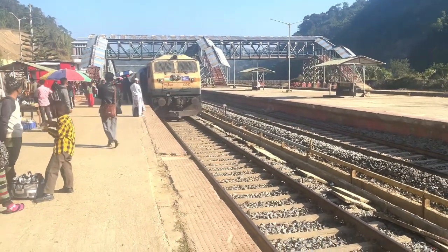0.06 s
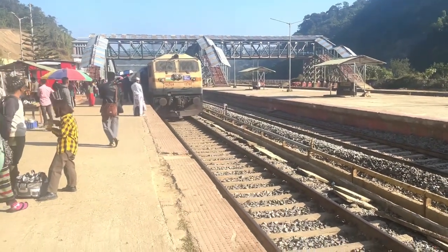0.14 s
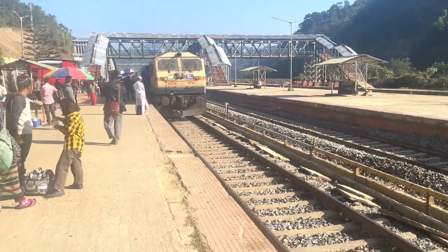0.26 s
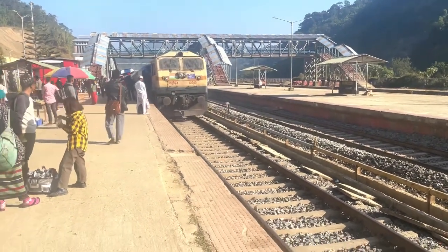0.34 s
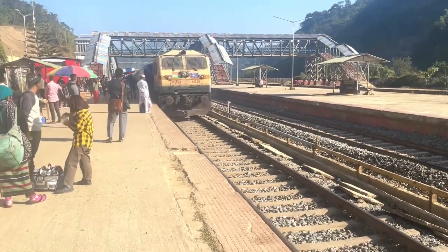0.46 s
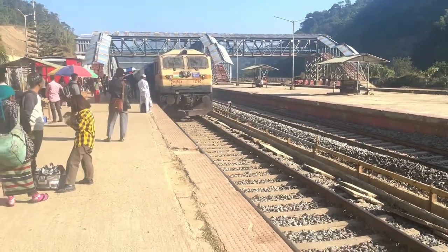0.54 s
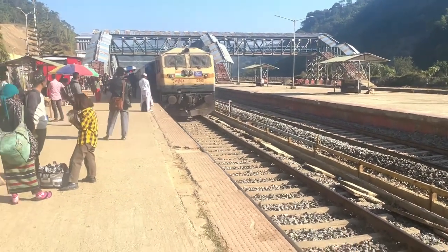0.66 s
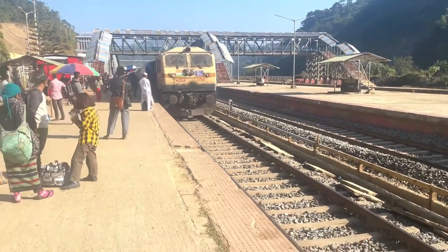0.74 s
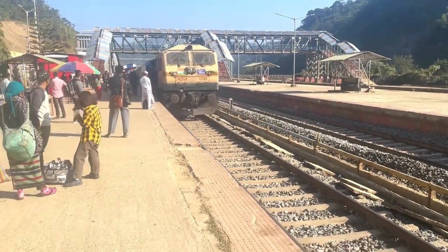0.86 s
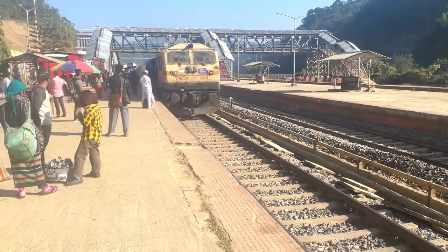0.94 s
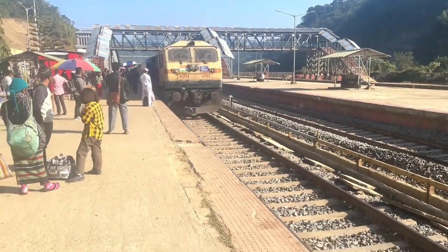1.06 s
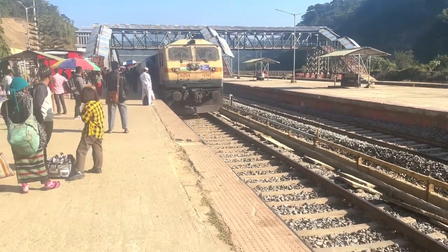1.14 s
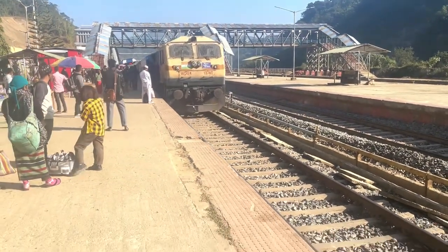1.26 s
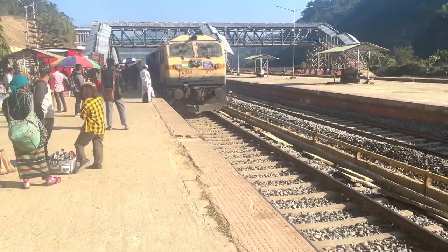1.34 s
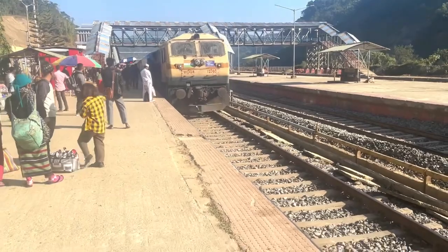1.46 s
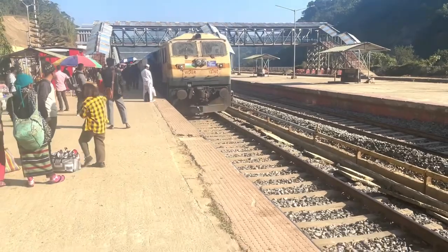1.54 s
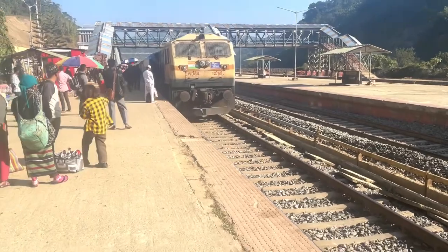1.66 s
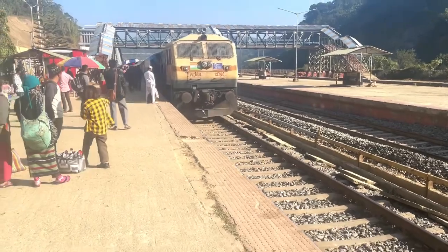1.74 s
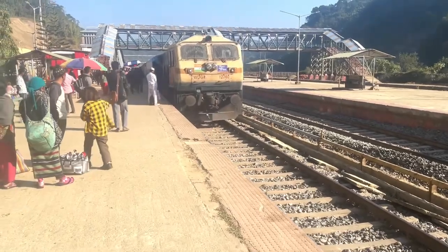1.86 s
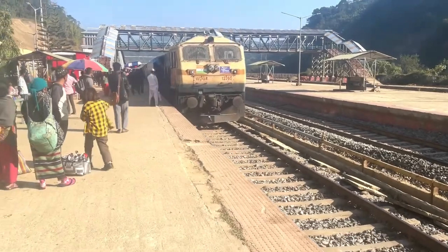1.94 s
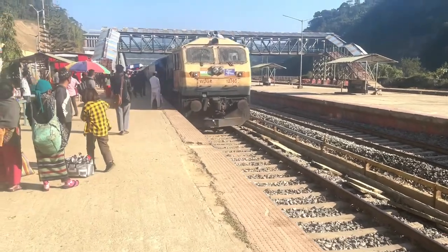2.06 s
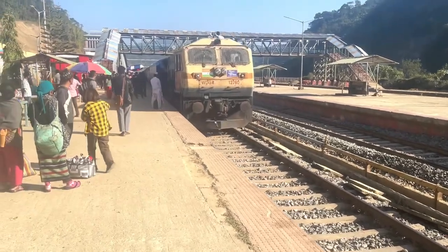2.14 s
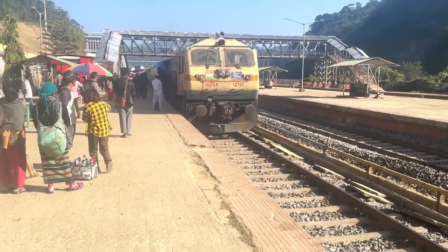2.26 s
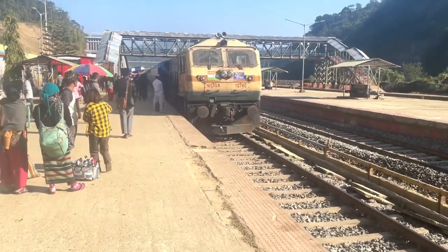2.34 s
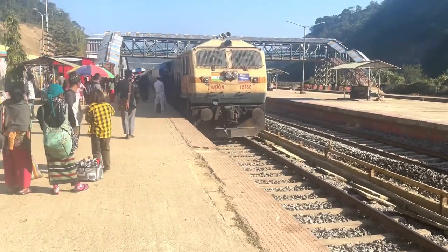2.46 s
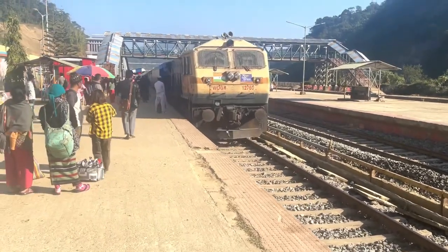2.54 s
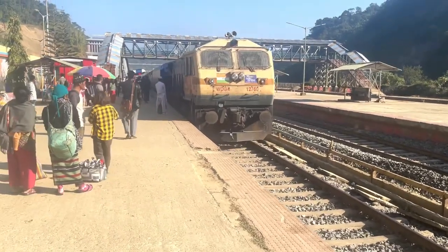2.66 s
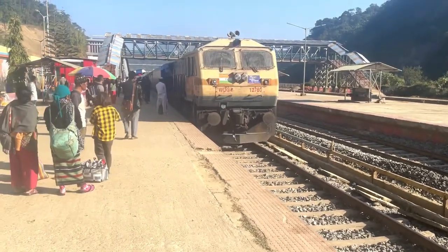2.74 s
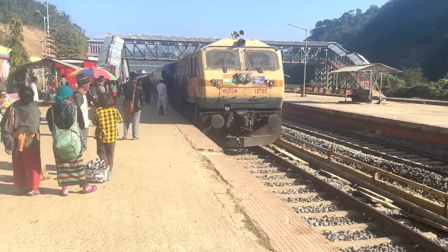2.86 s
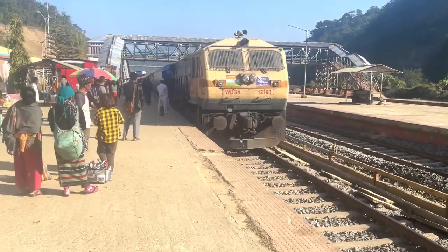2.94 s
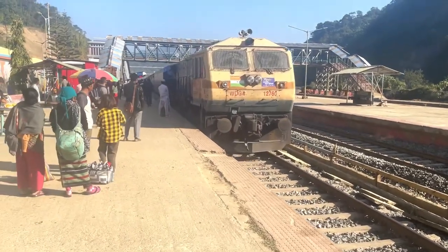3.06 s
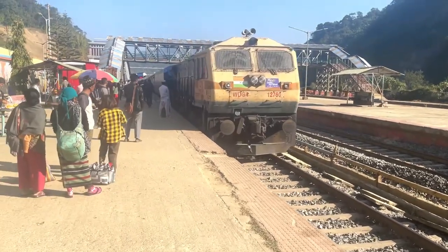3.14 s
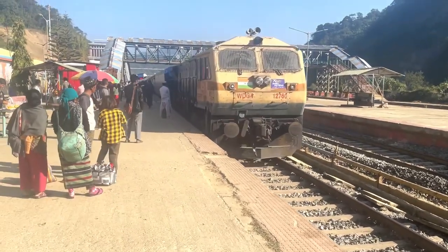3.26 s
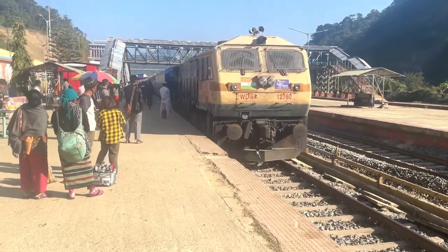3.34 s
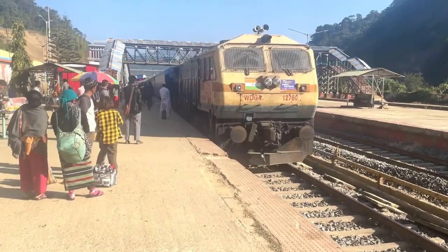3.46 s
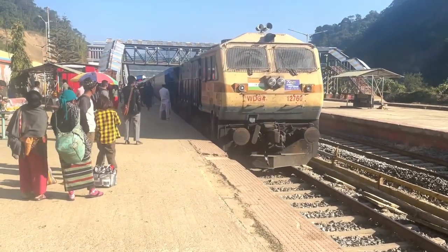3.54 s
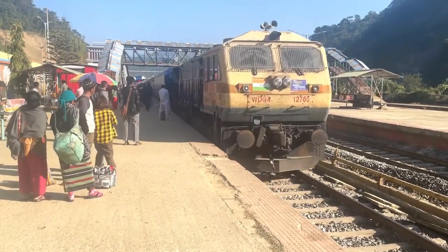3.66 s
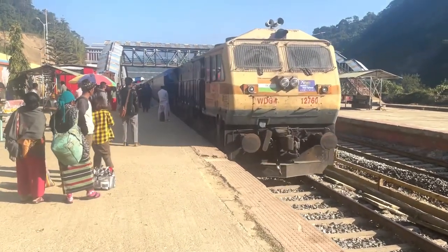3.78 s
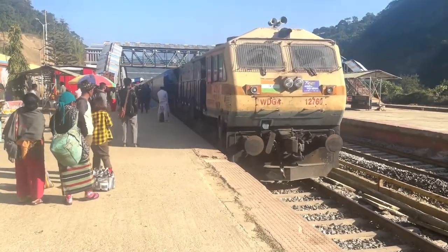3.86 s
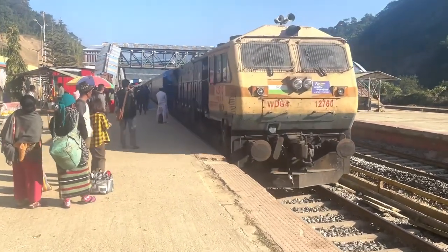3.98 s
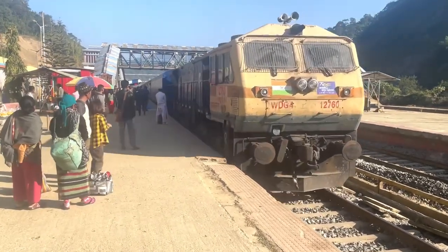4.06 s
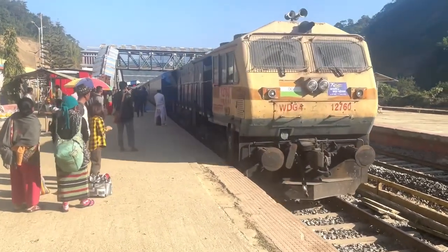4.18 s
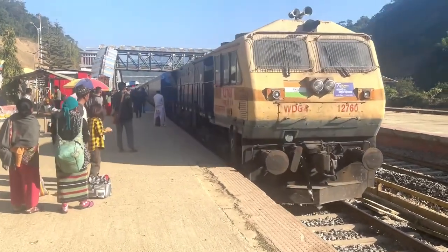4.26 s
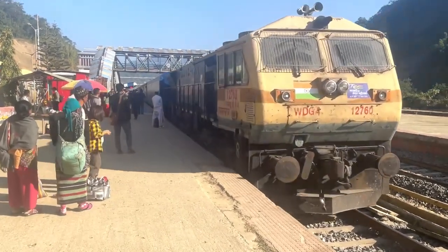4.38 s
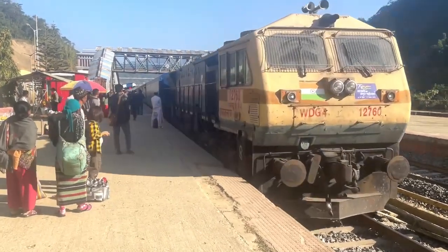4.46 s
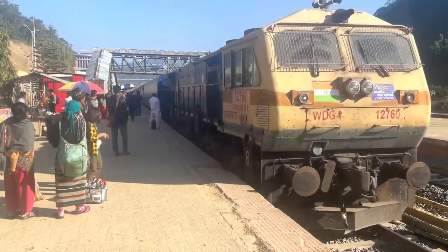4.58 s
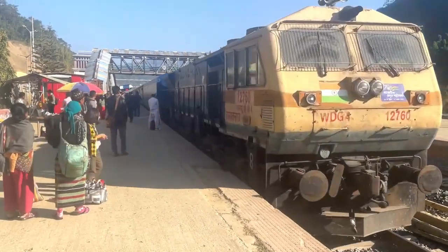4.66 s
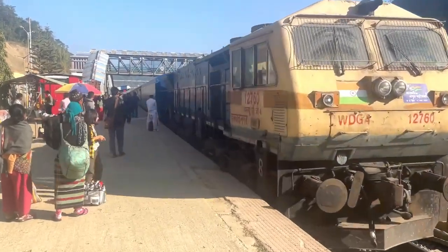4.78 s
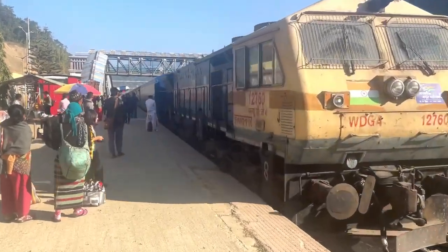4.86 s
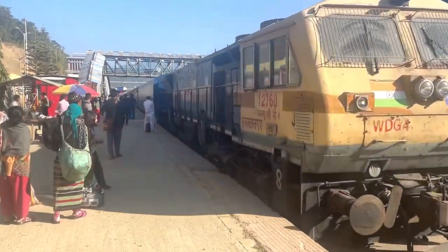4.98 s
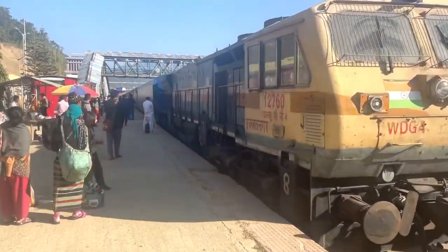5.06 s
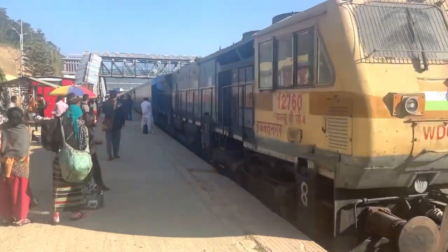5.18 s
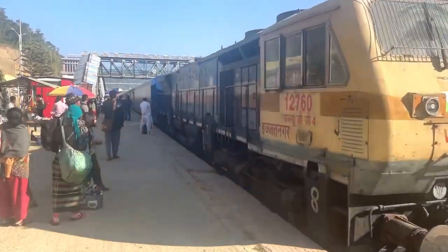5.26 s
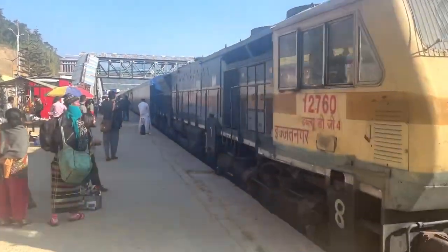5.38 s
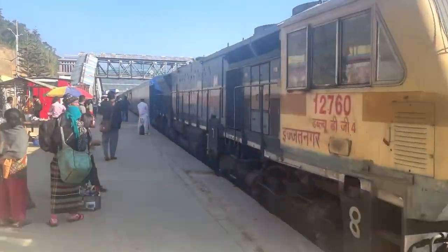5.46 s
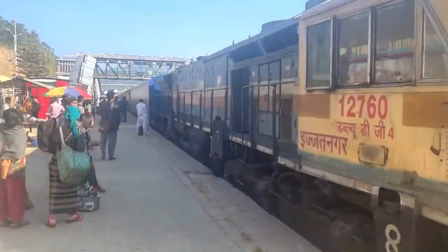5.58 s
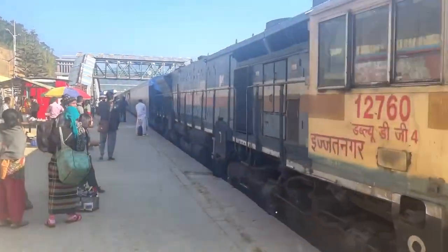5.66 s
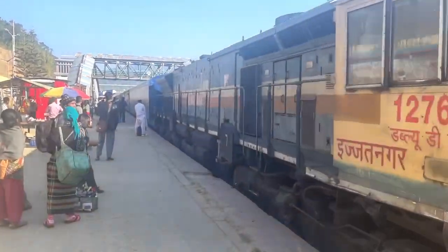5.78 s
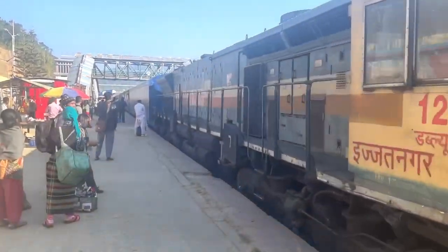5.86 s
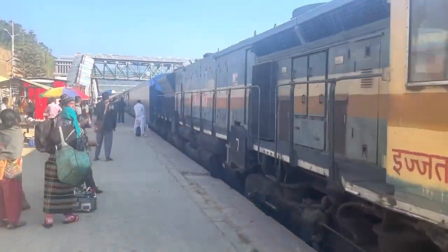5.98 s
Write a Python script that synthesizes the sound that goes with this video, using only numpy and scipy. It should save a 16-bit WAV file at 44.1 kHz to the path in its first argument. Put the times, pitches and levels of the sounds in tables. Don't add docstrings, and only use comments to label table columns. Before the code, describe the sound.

From 0 s a heavy diesel drone is already present: a deep buzzing hum around 50 and 90-105 Hz, throbbing unevenly about six times a second, with a second engine behind beating slowly against it. Above lies a soft, wide rush of wheels, fans and exhaust. Thin whines near 3 and 3.4 kHz, with fainter ones above 5 kHz, flicker in brief flares; treble dulls slightly around 1-2 s as people pass. From 3 s the locomotive nears and the whine grows sharper, squeal-like. Dull thuds fall at about 3.6, 3.9, 4.1 and 4.4 s, with a tiny air spit near 4. Through 4-5 s the roar and whines swell; another thud comes at 5.1. By 5.5-6 s the engine is abreast, full, rough and bright, still running when the sound cuts. Outdoor platform, handheld phone stereo, slight far-platform reflection, peaks softly rounded.

```python
import sys
import numpy as np
from scipy import signal
from scipy.fft import rfft, irfft, next_fast_len
from scipy.io import wavfile
from scipy.ndimage import uniform_filter1d

SR = 44100
rng = np.random.default_rng(int(sys.argv[2]) if len(sys.argv) > 2 else 0)


def master_out(mix):
    frames = np.transpose(np.atleast_2d(mix))
    ceiling = np.clip(frames, -1, 1)
    pcm = np.round(ceiling * 32767).astype(np.int16)
    wavfile.write(sys.argv[1], SR, pcm)


def invert_db(x):
    u = np.asarray(x, float) / 20
    return 10 ** u


N = 265041
T = np.arange(N) / SR


def front_engine(crank):
    # (order [per turn], far [dB], mid way [dB], near [dB])
    strong = [(8, -16, -13, -13), (9, -22, -30.5, -27), (15, -16, -14, -12.5), (16, -22.5, -26, -17.5),
              (17, -20.5, -17.5, -17)]
    # (order [per turn], far [dB], mid way [dB], near [dB])
    weak = [(7, -44, -43, -41), (10, -38, -42, -38), (11, -42, -40, -31), (12, -48, -33, -38),
            (13, -41, -28, -28), (18, -41, -35, -39), (19, -43, -42, -41), (21, -44, -42, -39),
            (23, -39, -41, -45), (24, -37, -35, -35), (30, -37, -38, -45), (31, -39, -41, -47),
            (32, -41, -42, -38), (33, -39, -42, -40)]
    # (order [per turn], time [s], half length [s], depth [dB], phase turn [rad])
    nulls = [(8, 5.12, 0.74, -16, -2.5), (9, 5, 0.83, -19, 1.5), (15, 0.04, 0.94, -5.5, 1.5),
             (15, 2.1, 0.31, -1.5, .5), (15, 3.25, 0.68, -3, 0.6), (16, 2.4, 1.5, -13.5, 1.78),
             (16, 5.9, 0.56, -7, -0.3), (17, 1.5, .3, -2.5, 0.03), (17, 2.48, 0.8, -9, 1.35),
             (17, 5.7, .5, -2, -0.1)]
    low_angle, high_angle = .26, 1.29
    silencer_lag = 1.35
    out = 0
    for order, *db in strong:
        start = low_angle if order < 13 else high_angle
        angle = order * (crank + start) - silencer_lag * (order == 16)
        gain = 1
        for null_order, s, half, depth_db, turn in nulls:
            if round(null_order) != round(order):
                continue
            passing = np.tanh((T - s) / half)
            floor = invert_db(2 * depth_db)
            gain = gain * np.sqrt(floor + (1 - floor) * passing ** 2)
            angle = angle + turn / 2 * (np.tanh(2 * (T - s) / half) + (order < 13))
        out = out + gain * tone(angle, approach(*db))
    for order, *db in weak:
        start = low_angle if order < 13 else high_angle
        angle = order * (crank + start + .01 * walk(1.5))
        out += tone(angle, approach(*db) + walk(1.5))
    return out


def rear_engine():
    # (order [per turn], far [dB], mid way [dB], near [dB])
    orders = [(8, -36, -35, -35), (15, -39, -32, -31), (17, -42, -39, -36), (17.9, -36, -32, -34),
              (36, -44, -38, -38)]
    shaft_hz = 5.955
    crank = 2 * np.pi * shaft_hz * T
    out = 0
    for order, *db in orders:
        angle = order * (crank + .015 * walk(1.2))
        out = out + tone(angle, approach(*db) + 1.5 * walk(1.5))
    return out


def exhaust(crank):
    direct = front_engine(crank) + rear_engine()
    port_slope = invert_db(1.5) * np.gradient(direct) * (1 + .5 * walk(0.7))
    return np.array([invert_db(-0.17) * direct + port_slope, invert_db(-1.0) * direct - port_slope])


def machinery(crank):
    # (time [s], half length [s], level [dB])
    blower_flares = [(0.023, 0.039, -44), (0.622, 0.034, -41.5), (1.04, 0.042, -33.5), (1.2, .04, -39),
                     (1.487, 0.044, -36), (1.9, 0.019, -39), (2.012, 0.024, -38.5), (2.402, 0.033, -35.5),
                     (2.556, 0.025, -34.5), (2.705, .05, -39), (2.873, 0.029, -34.5), (3.082, 0.026, -40),
                     (3.19, 0.038, -37), (3.36, 0.077, -38), (3.624, 0.05, -33), (3.791, 0.0098, -29),
                     (3.898, 0.023, -35.5), (4.07, 0.049, -35), (4.165, 0.01, -28), (4.335, 0.05, -26.5),
                     (4.5, 0.025, -27), (4.75, 0.031, -32.5), (4.88, 0.036, -26), (5.027, 0.079, -27.5),
                     (5.218, 0.056, -31), (5.422, .05, -29), (5.53, 0.034, -26.5), (5.805, .11, -26.5),
                     (6.0, 0.01, -29.5)]
    # (time [s], half length [s], level [dB])
    gear_flares = [(.6, .04, -40.5), (.82, .12, -46), (1.32, 0.11, -38.5), (1.92, .06, -41),
                   (2.2, 0.16, -46), (2.47, .07, -40), (2.74, 0.07, -40), (3.03, 0.073, -43),
                   (3.48, 0.0077, -38), (3.7, .12, -37), (3.95, 0.033, -33.5), (4.08, .07, -35),
                   (4.28, 0.017, -41.5), (4.5, 0.065, -35.5), (4.75, 0.01, -34), (4.85, .04, -36),
                   (5.12, 0.055, -37.5), (5.27, 0.047, -35), (5.6, .04, -36.5), (5.76, 0.038, -36.5),
                   (5.85, 0.018, -33), (5.95, .05, -45.5)]
    # (time [s], half length [s], level [dB])
    turbine_flares = [(.5, 0.072, -50), (2.05, 0.076, -50), (2.63, 0.16, -47.5), (3.03, 0.056, -38),
                      (3.3, .1, -44), (3.68, 0.14, -38), (4.05, 0.033, -42), (4.3, .05, -43.5),
                      (4.48, 0.079, -37.5), (4.92, 0.052, -50.5), (5.3, .12, -41.5), (5.55, 0.056, -45)]
    # (far [dB], mid way [dB], near [dB])
    hum = [
        (-49.5, -49, -44.5),
        (-57, -53.5, -43.5),
        (-56.5, -52.5, -48.5),
        (-63.5, -59, -44),
        (-60.5, -61, -45.5),
        (-60.5, -55.5, -45.5),
    ]
    # (time [s], half length [s], level [dB])
    hum_flares = [
        [(2.2, 0.48, -42.5), (3.68, 0.068, -40.5), (4.05, 0.062, -37.5), (4.5, .06, -40.5),
         (5.31, 0.093, -41.5), (5.74, 0.021, -37.5)],
        [(4.57, 0.034, -38), (5.75, 0.24, -36)],
        [(.55, .15, -52.5), (1.1, 0.12, -48), (4.42, 0.15, -47), (5.8, 0.19, -33)],
        [(4.2, 0.13, -48)],
        [(2.72, 0.091, -46.5)],
        [(2.98, .08, -53), (3.68, .08, -52), (5.15, 0.18, -42.5)],
    ]
    flutter_db, beads_db, beads_per_s = 3.2, 1.8, 28
    blower_db = flaring(approach(-47.5, -47.5, -37.5), blower_flares, flutter_db, 14)
    blower_db += beads_db * walk(beads_per_s)
    gear_db = flaring(approach(-48.5, -49.5, -50.5), gear_flares, flutter_db, 22)
    gear_db += beads_db * walk(beads_per_s)
    turbine_db = flaring(approach(-54, -47.5, -44.5) + shading(), turbine_flares, 3.7, 12)
    hum_db = [flaring(approach(*db), flares, 3.5, 7) for db, flares in zip(hum, hum_flares)]
    db_959, db_1340, db_1441, db_half, db_1922, db_5168 = hum_db
    near = approach(0, 0.68, 7.6)
    blower_hz = 3446.5 + 3 * walk(4)
    out = whine(blower_hz, blower_db + 2.5, crank, 0.061, 0.17, approach(1.5, 1.2, -4.5), .5)
    out += whine(blower_hz / 2, db_half + 0.5, crank, .1, 0.37, 0, 0)
    out += whine(blower_hz * 2, near - 70 + 3 * walk(6.2), crank, .2, 0.5, 2, 0)
    out += whine(2941, gear_db + 2.5, crank, 0.044, 0.25, -4.0, -4.2)
    out += whine(4700, near - 76 + 3 * walk(7.6), crank, .2, .3, 6, 0)
    out += whine(5357, turbine_db - 2.5, crank, 0.13, 0.48, -4, approach(5, .5, -.5))
    out += whine(5308, turbine_db - 8 + 2.0 * walk(10), crank, .2, 0.39, -4.5, 1.5)
    out += whine(10700, near - 82 + 3 * walk(8.01), crank, .5, 1.0, -14, 0)
    out += whine(959, db_959 + 1.5, crank, .05, .1, -7, 1.5)
    out += whine(1340, db_1340 - 2.0, crank, .05, 0.077, -3.5, 0)
    out += whine(1441, db_1441, crank, .05, 0.35, -0.5, 0)
    out += whine(1922, db_1922 - 0.5, crank, .05, 0.09, 1.5, 0)
    out += whine(5168, db_5168 - .8, crank, 0.072, 0.44, 0.71, .8)
    out += whine(480, near - 49 + 3 * walk(2.5), crank, 0.054, 0.19, -14.5, 1.5)
    out += whine(727, near - 50 + 3 * walk(2.4), crank, 0.06, 0.73, -19.5, 1.8)
    return out


def whine(hz, db, crank, throb, rough, side_db, left_db):
    angle = 2 * np.pi * np.cumsum(hz + 2.5 * walk(12)) / SR
    shake = 1 + throb * np.cos(8 * crank + 0.66 * walk(13.0)) + rough * walk(160)
    mid = shake * tone(angle, db)
    side = shake * tone(angle - np.pi / 2 + .5 * walk(4.33), db + side_db + 0.83 * walk(7.5))
    return np.array([invert_db(left_db / 2) * (mid + side), invert_db(-left_db / 2) * (mid - side)])


def knocks():
    # (time [s], peak [dB], resonance [Hz])
    thuds = [(3.589, -19, 326), (3.905, -11, 377), (4.086, -13, 231), (4.368, -16, 320), (5.141, -16, 253)]
    # (time [s], level [dB], centre [Hz], width [Hz], length [s])
    spits = [
        (3.96, -46, 12000, 8000, .04),
        (2.9, -65, 11500, 4000, .06),
        (4.68, -60, 11500, 4000, .05),
    ]
    bursts = list(spits) + [(s, db - 5, hz, .3 * hz, .03) for s, db, hz in thuds]
    out = np.zeros((2, N))
    for s, db, hz, width, length in bursts:
        t = np.arange(int(5 * length * SR)) / SR / length
        band = signal.butter(2, [hz - width / 2, hz + width / 2], "bandpass", fs=SR, output="sos")
        noise = rng.standard_normal((3, SR // 2))[:, :len(t)]
        ports = noise[0] + .4 * noise[1:]
        envelope = (1 - np.exp(-t / .15)) * np.exp(-t)
        burst = level(signal.sosfilt(band, ports), db) * envelope
        start = int(s * SR)
        out[:, start:start + len(t)] += burst[:, :N - start]
    return out


def roar(crank):
    # (frequency [Hz], density [dB per Hz])
    colour = [(25, -62.5), (36, -57.5), (62, -45), (115, -52), (190, -52.5), (300, -57.5), (750, -59),
              (1100, -67), (2000, -72), (2900, -69.5), (3800, -78), (6200, -85.5), (9000, -93),
              (15000, -109)]
    # (frequency [Hz], share [0-1])
    straight = [(60, 1), (130, 0.93), (280, 0.93), (600, 0.8), (1300, 0), (2400, 0.3), (4000, 0.12),
                (12000, 0.22)]
    # (frequency [Hz], left minus right [dB])
    left_lean = [(60, 11), (110, 7), (200, 3), (360, 1), (650, 5), (1180, 1.5), (2150, -2.5), (3900, 3),
                 (7070, -1.5), (12800, 1.5)]
    casing_hz = (340, 580, 715, 3430, 4340, 5345, 5880, 6900, 8700, 10690)
    # (width [Hz], level [dB])
    casing = [(37.4, -10.5), (16.7, -1), (71.4, -7), (214, 11.5), (440, -2), (269, 9), (159, -13),
              (140, 3.5), (500, 1), (346, 3.5)]
    # (time [s], gain [dB])
    closing = [(0, -5.5), (1.0, -3.5), (1.9, -2.5), (2.7, -1), (3.6, 0), (4.4, 1.5), (5.1, 4), (5.7, 6.5),
               (6.01, 8)]
    # (frequency [Hz], roar per nearness [dB/dB], share of the shading [0-1])
    law = [(50, .1, 0.), (150, .5, 0.), (500, 0.78, 0.12), (2000, 1, .2), (4300, 0.8, 0.5),
           (10000, 0.61, 0.7), (14000, 1, 0.7)]
    nearness, shade = curve(closing), shading()
    law_hz, slope, shaded = np.transpose(law)
    size = next_fast_len(N)
    hz = np.maximum(np.fft.rfftfreq(size, 1 / SR), 1)
    rings = 1
    for f, (width, db) in zip(casing_hz, casing):
        rings = rings + invert_db(db) / (1 + (2 * (hz - f) / width) ** 2) ** 2
    white = rfft(rng.standard_normal((3, size)))
    coloured = white * invert_db(on_log(colour, hz)) * rings * np.sqrt(2 / SR)
    direct, diffuse = np.zeros((2, N)), np.zeros((2, N))
    for centre in 25 * 2 ** np.arange(0, 9.6, .5):
        away = np.clip(np.log2(hz / centre) * 2, -1, 1)
        gain = np.interp(np.log(centre), np.log(law_hz), slope)
        cover = np.interp(np.log(centre), np.log(law_hz), shaded)
        flicker_db = 1.33 * walk(5) + min(centre / 6000, 1.6) * walk(24)
        db = gain * nearness + cover * shade + flicker_db
        puff = 1 + 0.046 * min(centre / 5000, 1) * np.cos(8 * crank + 1.8 * walk(7.4))
        band = irfft(coloured * np.cos(np.pi / 2 * away), size)[:, :N] * invert_db(db) * puff * SR / 2
        share = np.clip(on_log(straight, centre), 0, 1)
        lean = invert_db(on_log(left_lean, centre) / 2 * np.array([[1], [-1]]))
        direct += np.sqrt(share) * band[0] * lean
        diffuse += np.sqrt(1 - share) * band[1:] * lean
    return np.array([early(direct[0]), direct[1]]) + diffuse


def early(x):
    # (time [s], lead [samples])
    lead = [(0, 15), (3.2, 17), (3.7, 1), (6.01, 0)]
    return np.interp(np.arange(N) + curve(lead), np.arange(N), x)


def oppose(x):
    # (frequency [Hz], share in opposition far [0-1], near [0-1])
    opposed = [(1500, .44, .44), (2100, .5, .5), (2600, .36, .36), (3400, .42, .38), (3750, .8, .38),
               (4500, .4, .16), (6300, .2, .2), (7200, .5, .5), (7900, .99, .99), (8900, .99, .97),
               (10300, .4, .36), (11000, .06, .04), (12300, .16, .1), (13100, .5, .45), (13800, .995, .995)]
    pad = 2048
    x = np.pad(x, ((0, 0), (pad, next_fast_len(N + 2 * pad) - N - pad)), mode="reflect")
    both, apart = rfft(x[0] + x[1]), rfft(x[0] - x[1])
    hz, far, near = np.transpose(opposed)
    bins = np.log(np.maximum(np.fft.rfftfreq(x.shape[1], 1 / SR), 1))
    abreast = np.interp(T, [2.2, 5.0], [0, 1])
    out = 0
    for share, weight in ((far, 1 - abreast), (near, abreast)):
        turn = np.pi / 2 * np.interp(bins, np.log(hz), share)
        spectra = [both * np.cos(turn), apart * np.sin(turn)]
        mid, side = irfft(spectra, x.shape[1])[:, pad:pad + N]
        out = out + weight * np.array([mid + side, mid - side]) / np.sqrt(2)
    return out


def shading():
    # (time [s], half length [s], level [dB])
    passers = [(0.09, 0.15, -0.5), (1.305, 0.62, -6), (1.992, 0.47, -1), (3.403, 0.23, -1.5)]
    return sum(db * bell(s, half) for s, half, db in passers)


def flaring(db, flares, flutter_db, rate):
    power = invert_db(2 * (db + flutter_db * walk(rate)))
    power = power + sum(invert_db(2 * top) * bell(s, half) for s, half, top in flares)
    return 10 * np.log10(power)


def bell(s, half):
    out = np.zeros(N)
    span = slice(max(int((s - 3 * half) * SR), 0), int((s + 3 * half) * SR))
    out[span] = np.exp(-((T[span] - s) / half) ** 2)
    return out


def approach(far, mid, near):
    return np.interp(T, [.5, 3.2, 5.3], [far, mid, near])


def tone(angle, db):
    return np.sqrt(2) * invert_db(db) * np.cos(angle)


def walk(rate):
    k = max(int(SR / rate), 2)
    held = np.repeat(rng.standard_normal(N // k + 1), k)
    return 1.327 * uniform_filter1d(uniform_filter1d(held, k), k)[:N]


def level(x, db):
    return x * invert_db(db) / np.sqrt(np.mean(x ** 2))


def curve(table):
    s, value = np.transpose(table)
    return np.interp(T, s, value)


def on_log(table, hz):
    f, v = np.transpose(table)
    return np.interp(np.log(hz), np.log(f), v)


def scene():
    shaft_hz = 6.075
    crank = 2 * np.pi * shaft_hz * T
    return exhaust(crank) + machinery(crank) + oppose(roar(crank) + knocks())


def band_limit(x):
    return signal.sosfilt(signal.butter(12, 15780, fs=SR, output="sos"), x)


def record(dry):
    top = .97
    rounded = dry / (1 + np.abs(dry / top) ** 12) ** (1 / 12)
    opening = np.minimum(T / .004, 1)
    return band_limit(opening * (rounded + .0022))


dry = scene()
out = record(dry)
master_out(out)
```